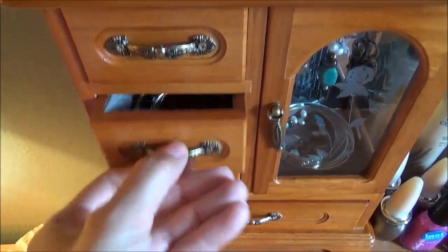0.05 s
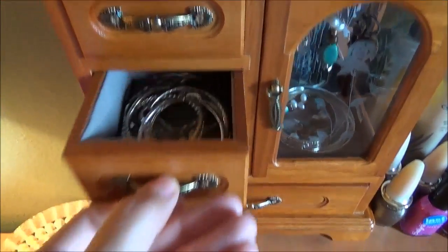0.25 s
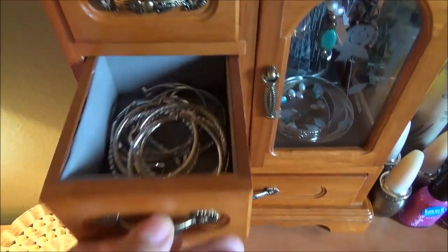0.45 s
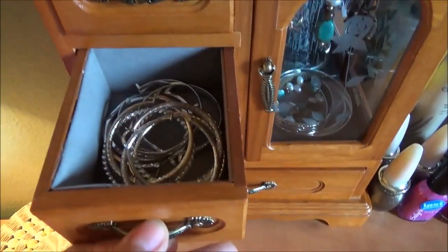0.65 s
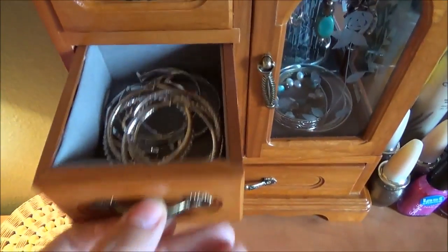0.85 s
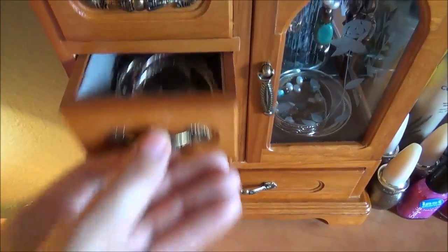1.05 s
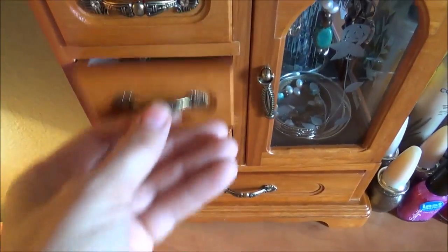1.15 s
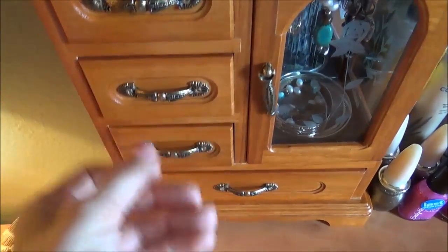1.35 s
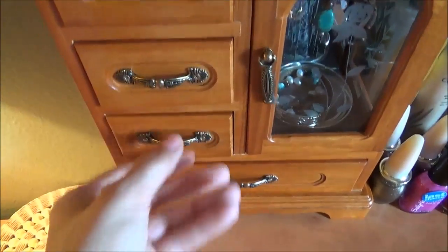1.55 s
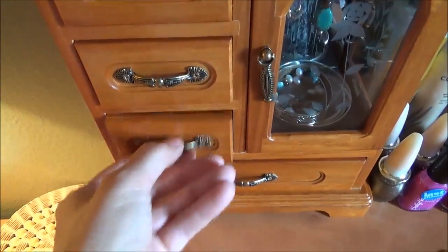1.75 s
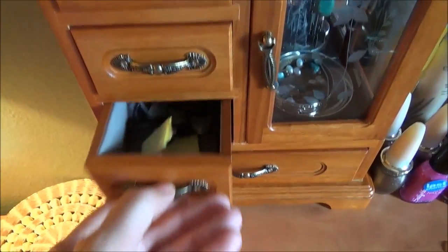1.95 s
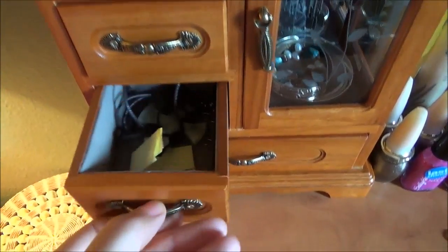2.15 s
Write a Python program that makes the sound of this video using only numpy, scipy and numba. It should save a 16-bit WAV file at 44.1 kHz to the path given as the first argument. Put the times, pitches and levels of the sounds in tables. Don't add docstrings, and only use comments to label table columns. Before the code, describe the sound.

Dry wood-on-wood scraping of little drawers, a hard clattering shut, faint metal jingle, quiet bedroom

```python
import sys
import numpy as np
from scipy import signal
from scipy.fft import rfft, irfft
from scipy.io import wavfile
from scipy.ndimage import uniform_filter1d
from numba import njit

SR = 44100
rng = np.random.default_rng(int(sys.argv[2]) if len(sys.argv) > 2 else 0)


def bounce(signal):
    frames = np.transpose(np.atleast_2d(signal))
    limited = np.clip(frames, -1, 1)
    pcm = np.round(limited * 32767).astype(np.int16)
    wavfile.write(sys.argv[1], SR, pcm)


def makeup_ratio(level_db):
    decades = np.asarray(level_db, float) / 20
    return 10 ** decades


N = 96579

# start_s, rub_db, grit_against_rub_db, cavity_hz
SLIDES = [
    [(0, -31, -11.5, 844), (.05, -24.5, -15.5, 770), (.165, -27.5, -16, 835), (.19, -24.5, -12.5, 857),
     (.27, -23.5, -15.5, 970), (.30, -29, -15.5, 953), (.47, -34.5, -21, 905), (.505, -56, -5.5, 904),
     (.57, -64, -19, 1075)],
    [(.66, -52, -43, 903), (.765, -43.5, -21, 930), (.83, -30, -22.5, 900), (.945, -25.5, -15.5, 967),
     (.96, -19, -14, 970), (1.03, -15, -15, 970), (1.065, -21, -14, 867), (1.125, -24.5, -12, 848),
     (1.172, -34, -1, 710)],
    [(1.73, -51.5, -3.5, 710), (1.79, -28.5, -13, 695), (1.85, -35, -6.5, 765), (1.89, -24.5, -13.5, 767),
     (1.94, -25, -18.5, 720), (2.0, -22.5, -26.5, 707), (2.052, -20.5, -26.5, 776), (2.064, -30, -24, 745),
     (2.14, -40.5, -18.5, 780), (2.19, -29, -37, 807)],
]
# first_s, second_s, first_db, second_db
OPENING = [
    (0, 0.046, -2.5, 4.5),
    (1.085, 1.19, 1.5, -11),
    (1.855, 1.93, -5.5, 4),
]
# peak_s, peak_db, ring_hz
CATCHES = [(0.038, -23, 800), (0.067, -20, 774), (0.09, -20, 851), (0.102, -18, 850), (0.161, -16, 890),
           (0.188, -17, 880), (0.233, -15, 1022), (0.24, -14.5, 992), (0.257, -19, 983),
           (0.273, -16.5, 884), (0.282, -28, 980), (0.337, -26, 850), (0.374, -28.5, 930),
           (0.401, -24, 997), (0.429, -26, 904), (0.465, -29, 950), (0.539, -36.5, 950),
           (0.553, -43.5, 1040), (0.728, -39, 877), (0.829, -23, 878), (0.849, -20, 884),
           (0.884, -25.5, 1010), (0.915, -16, 901), (0.927, -16, 961), (0.943, -13.5, 905),
           (0.962, -14, 1034), (0.981, -15.5, 997), (0.998, -11.5, 853), (1.005, -14, 937),
           (1.024, -5.5, 916), (1.042, -10.5, 977), (1.061, -7, 850), (1.086, -11, 840), (1.105, -14, 940),
           (1.125, -17.5, 757), (1.179, -16.5, 780), (1.189, -12.5, 802), (1.203, -18.5, 792),
           (1.211, -29, 883), (1.219, -27, 1005), (1.226, -17, 824), (1.235, -15.5, 746), (1.242, -35, 834),
           (1.302, -42, 812), (1.609, -40, 720), (1.717, -28.5, 814), (1.726, -28, 858), (1.788, -25, 726),
           (1.794, -30, 760), (1.803, -29, 742), (1.813, -26, 720), (1.876, -30, 877), (1.919, -21.5, 892),
           (1.941, -17, 760), (1.985, -13.5, 742), (2.021, -17.5, 822), (2.049, -14, 741),
           (2.182, -39, 726)]
# peak_s, peak_db, ring_hz
THUMPS = [(0.081, -24, 429), (0.139, -20, 413), (0.166, -23, 419), (0.235, -23.5, 346), (0.334, -26, 400.0),
          (0.537, -39.5, 380.0), (0.922, -21.5, 325), (0.968, -23, 357), (0.993, -13.5, 383),
          (1.003, -17.0, 410.0), (1.032, -19, 387), (1.089, -21.5, 355), (1.176, -11, 362),
          (1.21, -15, 402), (1.228, -16, 388), (1.241, -21.5, 344), (1.616, -26.5, 316),
          (1.642, -34.0, 414), (1.72, -29, 410.0), (1.734, -25.5, 464), (1.79, -23.5, 478),
          (1.815, -26.5, 380), (1.885, -23, 396), (1.923, -23, 425), (2.034, -22.5, 450.0)]
# start_s, peak_db, crack_against_peak_db
KNOCKS = [
    (1.174, -3, -4.5),
    (1.181, -20, 2),
    (1.193, 0, 3),
    (1.201, -1, -2),
    (1.214, -4.5, 5),
    (1.226, -9, -11),
    (1.609, -25, -20),
    (1.642, -26, -20),
    (1.716, -15, -54),
]
# start_s, peak_db, ring_hz
TICKS = [(0.212, -22, 2760), (0.772, -38.5, 1610), (0.803, -35, 1620), (0.959, -26, 8380),
         (0.974, -23, 2810), (1.01, -24.5, 6200), (1.262, -41, 9200), (1.272, -39, 9200),
         (1.581, -46, 6900), (1.607, -61, 6140), (1.564, -48, 3700), (1.608, -35.5, 3280),
         (1.621, -43.5, 7000), (1.638, -42, 3170), (1.705, -40.5, 10400), (1.744, -38, 7100),
         (1.875, -25, 1130), (1.886, -35, 1300), (2.041, -28, 2520)]
# centre_hz, width_hz, level_db
UPPER_PANELS = [(254, 79, -7), (323, 17.2, 1), (409, 30, -2), (467.3, 11, 0.5), (571, 102, -10),
                (718, 38, -7), (1092, 64, -7.5), (1315, 150, -19), (1634, 36.5, -8.5), (1900, 180, -19),
                (2720, 114, -17.5), (3280, 48, -25.5)]
# centre_hz, width_hz, level_db
LOWER_PANELS = [(242, 53, -5.5), (324, 27.7, 5), (432, 130, -7.5), (575, 28, -1.5), (850, 104, -11),
                (1060, 70, -13), (1406, 112, -10.5), (2604, 100, -26), (3640, 170, -41)]
# centre_hz, width_hz, level_db
CABINET = [(139, 106, -15), (233, 30, -6), (299, 31, -2.5), (423, 8.6, 1.5), (511, 72, -7), (729, 21, -4),
           (799, 24.4, 4.5), (822, 71, -1), (970, 12, -3.5), (1077, 29, -9.5), (1370, 87, -12),
           (1920, 550, -18), (2650, 120, -30)]
# centre_hz, width_hz, level_db
BANGLES = [(4320, 190, 4), (5750, 110, 6), (6200, 550, 5.5), (7560, 94, 9), (8200, 93, -21),
           (10000, 160, 7), (10670, 440, 6)]
# frequency_hz, density_db
GRIT = [(880, -20), (1500, -8), (2740, -4.5), (3880, -12), (10800, -8), (14000, -47), (22000, -120)]
# frequency_hz, density_db
AIR = [(15, -26), (25, -25), (137, -0.5), (222, -1.5), (1040, -9), (1650, -14.5), (10800, -23.5),
       (14000, -34), (22000, -120)]
# frequency_hz, left_minus_right_db
PORT_BALANCE = [(40, -12), (110, -4), (250, -7), (450, -3.5), (700, 0.5), (1100, 1.5), (2000, 2.3),
                (11000, 0)]
# rise_start_s, rise_end_s, fall_start_s, fall_end_s
HANGING_S = (.27, .31, .9, .95)

CAVITY_WIDTH_HZ, CAVITY_SPLIT = 43.6, 0.067
SLIPS_PER_S, SLIP_SCATTER_DB, JUDDER_DB, JUDDER_HZ = 2700, 2, -1.5, 59.7
RUB_DB, STICK_S, STICK_DB = -1, .008, -4
WALL_DB, WANDER_DB, WANDER_HZ = 3.5, 1.5, 18.66
BRIGHTEN = 0.35
PUSH_S, THUD_DB = 0.00054, -12
CATCH_RISE_S, CATCH_FADE_S, THUMP_RISE_S, THUMP_FADE_S = 0.002105, 0.004745, 0.0029, 0.007
BEAT_DB = -7.5
BANGLE_DB, HANGING_DB = -7, 5
KNOCK_DB, CRACK_DB, CRACK_S = -9, -4.5, 0.0054
TICK_DB, TICK_WIDTH_HZ = 0.5, 110
SETTLE_S, SETTLE_DB, SETTLE_T60_S, SETTLE_WOOD_DB, LINGER_DB = 1.182, -51.5, 3.05, -19, 3.5
ROOM_T60_S, ROOM_DB, ROOM_DAMP_HZ = 0.2, -22.5, 3400
AIR_DB, AIR_SIDE_DB, RUMBLE_DB, HUM_HZ, HUM_DB = -52.5, -16.5, -62, 120.7, -60.5
LOW_CUT_HZ, TOP_HZ, CEILING = 110, 11007, .8
GRIT_SIDE_DB, NEAR_SIDE_DB, NEAR_SIDE_S = -12.5, -18.5, 0.0013


def slide(rows, panels, opening):
    t = np.arange(N) / SR
    s, db, grit_db, hz = np.array(rows).T
    low_panels, thin_walls = panels[:5], panels[5:]
    rub_db = np.interp(t, s, db)
    cavity_hz = np.interp(t, s, hz)
    share = makeup_ratio(np.interp(t, opening[:2], opening[2:]) / 2)
    moving = np.interp(t, [s[0] - .01, s[0], s[-1], s[-1] + 0.068], [0, 1, 1, 0])

    catch_s, catch_db, _ = np.array([r for r in CATCHES if s[0] < r[0] < s[-1]]).T
    stuck = (np.abs(t - catch_s[:, None] + STICK_S / 2) < STICK_S).any(axis=0)
    force = moving * makeup_ratio(rub_db + RUB_DB + STICK_DB * stuck)
    low = slips(makeup_ratio(JUDDER_DB * walk(JUDDER_HZ)))
    high = slips(makeup_ratio(JUDDER_DB * walk(JUDDER_HZ)))

    wall_gains = []
    for k in range(len(panels)):
        wander_db = WANDER_DB * walk(WANDER_HZ).clip(-2, 1)
        wall_gains.append((-1) ** k * makeup_ratio(WALL_DB + wander_db + BRIGHTEN * (rub_db + 21)))

    def body(push):
        wood = ring(low * push / share, low_panels)
        for gain, wall in zip(wall_gains, thin_walls):
            wood = wood + ring(high * push * gain / share, [wall])
        for sign in (-1, 1):
            centre_hz = cavity_hz * (1 + sign * CAVITY_SPLIT)
            wood = wood + sign * svf(high * push * share, centre_hz, CAVITY_WIDTH_HZ)
        return wood

    thuds = struck(catch_s - STICK_S / 3, catch_db + THUD_DB, PUSH_S / 2, thin_walls)
    wood = body(force) / np.std(body(0.72)) + thuds
    gate = moving * makeup_ratio(np.interp(t, s, db + grit_db) + 1.5 * walk(90))
    return np.array([wood, gate])


def slips(judder):
    size = rng.standard_normal(N) * makeup_ratio(SLIP_SCATTER_DB * rng.exponential(size=N).clip(0, 3))
    return (rng.random(N) < SLIPS_PER_S / SR) * size * judder


def swells(rows, rise_s, fade_s):
    u = np.arange(3000) / SR
    x = np.zeros(N + 3000)
    shape = (1 - np.exp(-u / rise_s)) ** 2 * np.exp(-u / fade_s)
    for s, db, hz in rows:
        beat, phase = rng.uniform(-1.038, 1, 2)
        tone = np.sin(2 * np.pi * hz * u)
        neighbour = np.sin(2 * np.pi * (hz * u * (1 + beat / 4) + phase))
        i = int(s * SR) - shape.argmax()
        x[i:i + len(u)] += makeup_ratio(db) * shape / shape.max() * (tone + makeup_ratio(BEAT_DB) * neighbour)
    return x[:N]


def knocks():
    s, db, crack_db = np.array(KNOCKS).T
    boom = struck(s, db + KNOCK_DB, 0.00065, CABINET, flip=-1.026)
    crack_colour = [(250, -6), (800, 10.5), (3000, -2), (5000, -13.5), (11000, -16.5)]  # Hz, dB
    crack = colour(cracks(s, db + crack_db + CRACK_DB), crack_colour)
    rings = sum(struck([a], [b], 2 / SR, [(hz, TICK_WIDTH_HZ, 0)]) for a, b, hz in TICKS)
    tick_s, tick_db, _ = np.array(TICKS).T
    return boom + crack + rings + cracks(tick_s, tick_db + TICK_DB)


def hiss():
    grains = rng.standard_normal(N) * makeup_ratio(4.0 * rng.exponential(size=N).clip(0, 4))
    grit = colour(grains, [(700, -44)] + GRIT)
    shiver = sum(ring(rng.standard_normal(N), [m]) * makeup_ratio(6.5 * walk(30.5).clip(-3, 2)) for m in BANGLES)
    hanging = np.interp(np.arange(N) / SR, HANGING_S, [0, 1, 1, 0])
    return unit(grit) + makeup_ratio(BANGLE_DB + HANGING_DB * hanging) * unit(shiver)


def settle():
    t = np.arange(N) / SR - SETTLE_S
    rattle = makeup_ratio(SETTLE_DB - 60 * t.clip(0) / SETTLE_T60_S + 2.0 * walk(30.44)) * (t > 0)
    chatter = makeup_ratio(SETTLE_WOOD_DB - 60 * np.clip(t - .04, 0, 1) / 0.2) * (t > 0)
    wood = unit(ring(slips(1), CABINET)) * (chatter + makeup_ratio(LINGER_DB) * rattle)
    return np.array([wood, rattle])


def bedroom(x):
    t = np.arange(SR // 2) / SR
    tail = rng.standard_normal((2, len(t))) * makeup_ratio(-60 * t / ROOM_T60_S) * np.clip(t / 0.00067, 0, 1)
    tail = signal.lfilter(*signal.butter(1, ROOM_DAMP_HZ, fs=SR), tail)
    tail = tail / np.sqrt(np.sum(tail ** 2, 1, keepdims=True))
    return signal.fftconvolve(x[None], tail, axes=1)[:, :N]


def air():
    mid, side = (unit(colour(rng.standard_normal(N), AIR)) * makeup_ratio(AIR_DB - 0.5 + walk(8.4)) for _ in range(2))
    hum = makeup_ratio(HUM_DB + 3.0 * walk(9)) * np.sin(2 * np.pi * HUM_HZ * np.arange(N) / SR)
    rumble_colour = [(30, -11), (80, -5), (150, -36), (300, -34)]  # Hz, dB
    rumble = makeup_ratio(RUMBLE_DB) * unit(colour(rng.standard_normal(N), rumble_colour))
    return mid + hum + (makeup_ratio(AIR_SIDE_DB) * side + rumble) * np.array([[1], [-1]])


@njit
def svf(x, hz, width):
    y, b, l = np.empty(len(x)), 0., 0.
    for i in range(len(x)):
        g, k = np.tan(np.pi * hz[i] / SR), width / hz[i]
        v = (b + g * (x[i] - l)) / (1 + g * (g + k))
        b, l, y[i] = 2 * v - b, l + 2 * g * v, k * v
    return y


def ring(x, modes, flip=-1):
    total = np.zeros(N)
    for k, (hz, width, db) in enumerate(modes):
        total += flip ** k * makeup_ratio(db) * svf(x + 1e-18, np.full(N, 1. * hz), 1. * width)
    return total


def blows(times, dbs, length_s):
    x = np.zeros(N)
    np.add.at(x, (np.asarray(times) * SR).astype(int), makeup_ratio(dbs))
    push = np.sin(np.pi * np.clip(np.arange(200) / (length_s * SR), 0, 1))
    return np.convolve(x, push)[:N]


def struck(times, dbs, length_s, modes, flip=1):
    single = ring(blows([0], [0], length_s), modes, flip)
    return ring(blows(times, dbs, length_s), modes, flip) / np.abs(single).max()


def cracks(times, dbs):
    tail = np.exp(-np.arange(1500) / (CRACK_S * SR))
    return np.convolve(blows(times, dbs, 2 / SR), tail)[:N] * rng.standard_normal(N) / 2


def walk(hz):
    k = int(SR / hz)
    held = np.repeat(rng.standard_normal(N // 50), k)[:N]
    return unit(uniform_filter1d(held, k))


def colour(x, points, share=1):
    hz, db = np.array(points, float).T
    f = np.fft.rfftfreq(N, 1 / SR)
    return irfft(rfft(x) * makeup_ratio(share * np.interp(np.log(f + 1), np.log(hz + 1), db)), N)


def unit(x):
    return x / np.sqrt(np.mean(x ** 2))


def scene():
    drawers = (UPPER_PANELS, UPPER_PANELS, LOWER_PANELS)
    wood, gate = sum(slide(*k) for k in zip(SLIDES, drawers, OPENING)) + settle()
    wood = wood + swells(CATCHES, CATCH_RISE_S, CATCH_FADE_S) + swells(THUMPS, THUMP_RISE_S, THUMP_FADE_S)
    low_cut = signal.butter(2, LOW_CUT_HZ, "high", fs=SR, output="sos")
    near = signal.sosfilt(low_cut, wood + gate * hiss() + knocks())
    scatter = rng.standard_normal(600) * np.exp(-np.arange(600) / (NEAR_SIDE_S * SR))
    scattered = np.convolve(near, scatter / np.linalg.norm(scatter))[:N]
    side = makeup_ratio(GRIT_SIDE_DB) * gate * hiss() + makeup_ratio(NEAR_SIDE_DB) * scattered
    return near + side * np.array([[1], [-1]]) + makeup_ratio(ROOM_DB) * bedroom(near) + air()


def low_pass(x):
    return signal.sosfilt(signal.butter(12, 12180, fs=SR, output="sos"), x)


def record(dry):
    left = colour(dry[0], PORT_BALANCE, share=.5)
    right = colour(dry[1], PORT_BALANCE, share=-.5)
    rounded = CEILING * np.tanh(np.array([left, right]) / CEILING)
    top_cut = signal.ellip(10, .3, 60, TOP_HZ, fs=SR, output="sos")
    return low_pass(signal.sosfilt(top_cut, rounded))


dry = scene()
out = record(dry)
bounce(out)
```